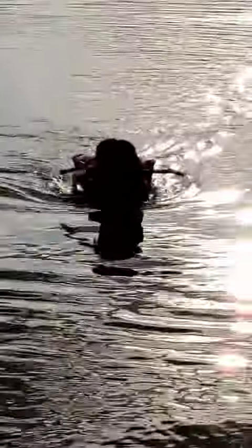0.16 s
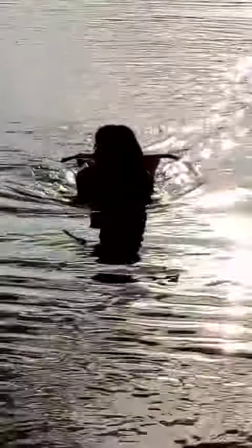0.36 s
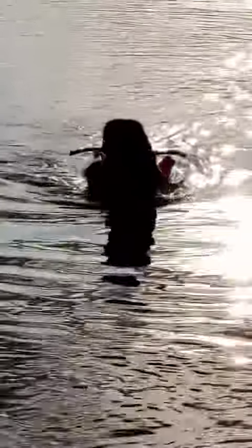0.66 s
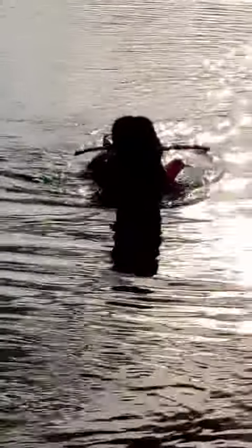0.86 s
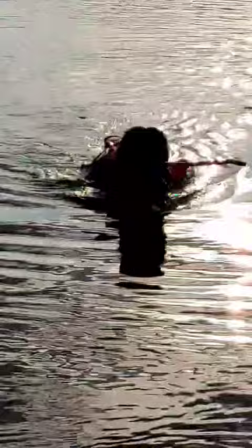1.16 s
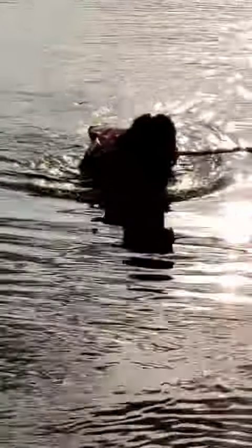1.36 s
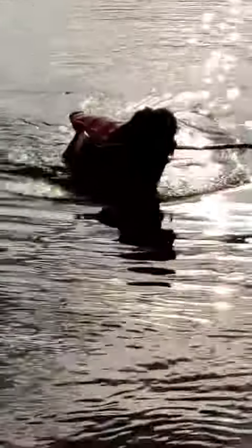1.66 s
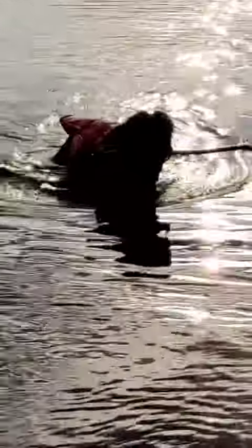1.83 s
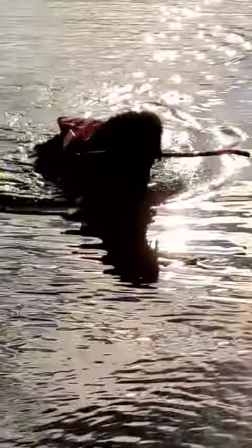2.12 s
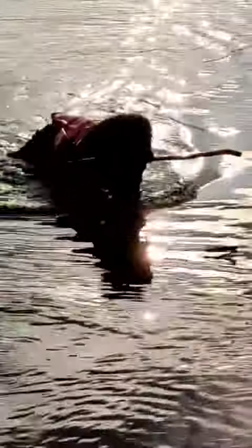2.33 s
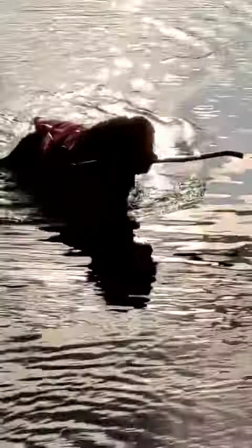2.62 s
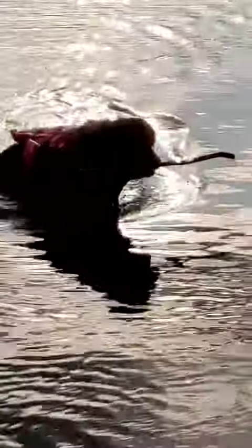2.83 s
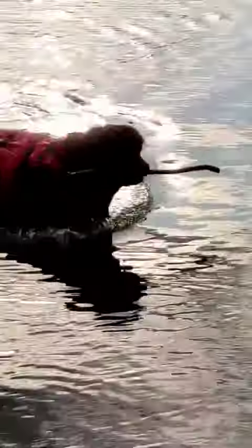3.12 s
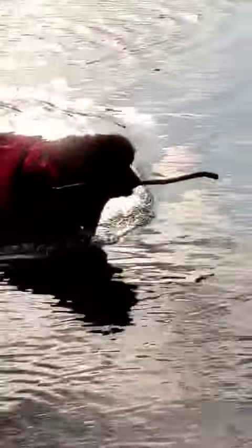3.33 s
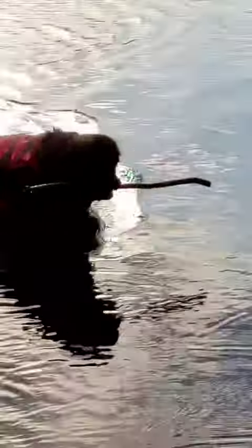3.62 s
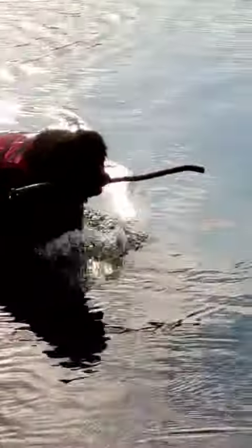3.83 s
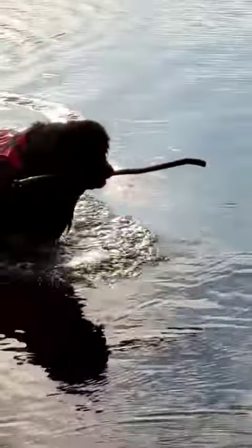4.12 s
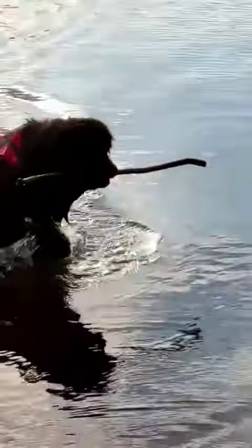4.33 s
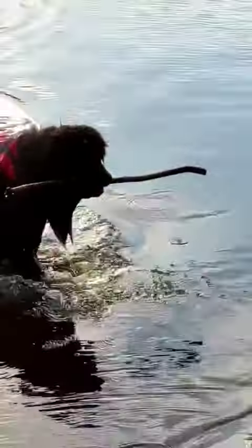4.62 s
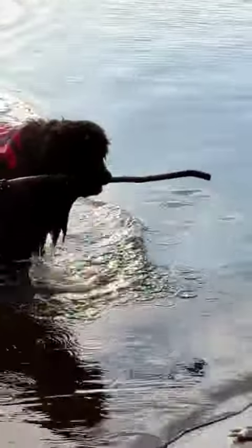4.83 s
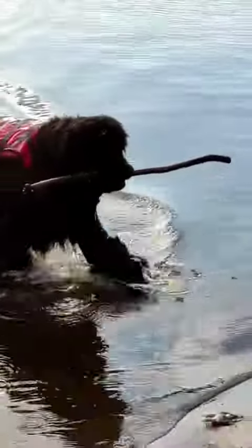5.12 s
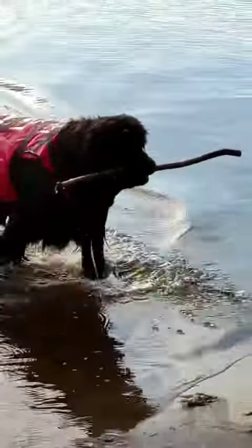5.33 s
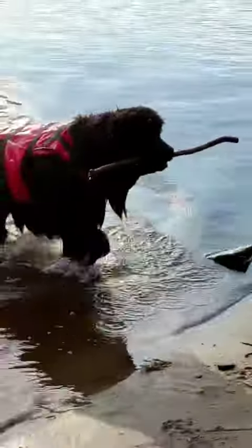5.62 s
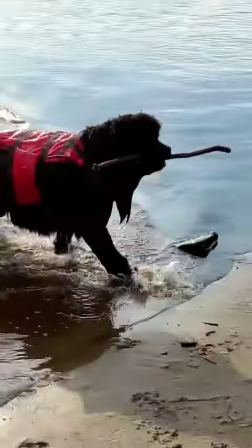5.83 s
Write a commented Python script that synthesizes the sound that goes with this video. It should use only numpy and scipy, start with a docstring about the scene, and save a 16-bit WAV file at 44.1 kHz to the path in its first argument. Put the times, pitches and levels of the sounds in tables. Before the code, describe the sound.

A big dog swims toward a river bank and wades out, heard outdoors in stereo over a steady low rumble and very faint hiss. From 0 to 0.6 s there are light churning, hollow gulps and plinking drips, with a tight pair of dull paw slaps near 0.4 s. A few drips tick at 0.75 s, along with a deep soft wind puff on the microphone. The water then calms; from about 1.3 to 2.9 s only tiny high pings and faint rising chirps remain, with another low puff at 2.2 s. At 2.9 s the churn abruptly returns, surging with leg strokes and growing to a full bubbling splash around 3.8 to 4.2 s, with a sharp high ping at 4.15 s. Another splash comes at 4.45 s, followed by an easing near 4.9 s. A bright plop at 5.1 s leads into dense gurgling, dripping and spatter until the end.

```python
"""A big dog paddles to a river bank with a stick, then wades out through the shallows.
First come gulps of trapped air and slaps of paws, then a lull of pings and soft rising chirps; at about 3 s
the churn returns and grows, with gulps, drips and spatter. Ringing bubbles make the gulps, churn and drips;
random impacts make the slaps and spray. Filtered noise gives the steady outdoor rumble and hiss
throughout and two deep puffs of wind on the microphone, at about 0.7 and 2.2 s."""
import sys
import numpy as np
from scipy import signal
from scipy.fft import rfft, irfft, next_fast_len
from scipy.io import wavfile

SR = 44100
rng = np.random.default_rng(int(sys.argv[2]) if len(sys.argv) > 2 else 0)


def persist_wave(psi):
    """Save psi, clipped to +-1, as 16-bit WAV."""
    counts = np.round(np.clip(psi, -1, 1) * 32767).astype(np.int16)
    wavfile.write(sys.argv[1], SR, np.atleast_2d(counts).T)


N = 263277   # length [samples]
TIME = np.arange(N) / SR   # [s]
FFT_SIZE = next_fast_len(N + 8192, True)
BINS = np.maximum(np.fft.rfftfreq(FFT_SIZE, 1 / SR), 1)   # [Hz]
LEFT_LAG_S, LAG_SPREAD_S = .00015, .00007   # mean delay of the left channel, change per unit of place

# big pockets of air closed by legs and waves:
# (time [s], relative peak level [dB], pitch [Hz], ringing [cycles], pitch rise [share])
GULPS = [(0.105, -36.5, 900, 24, 0.15), (0.212, -34.5, 352, 16, 0.43), (0.373, -31, 352, 22, 0.28),
         (0.379, -30.5, 840, 26, 0.034), (0.396, -41, 774, 39, -0.013), (0.42, -34.5, 258, 23, 0.096),
         (2.951, -30.5, 305, 8.1, 0.052), (3.017, -33, 950, 27, 0.028), (3.184, -37, 543, 22, .2),
         (3.358, -34, 540, 26, -0.38), (3.367, -28.5, 240, 11, 0.034), (3.394, -30.5, 446, 27, -0.14),
         (3.515, -35, 607, 23, 0.066), (3.559, -34.5, 390, 23, 0.075), (3.601, -29.5, 764, 9.3, 0.42),
         (3.755, -27.5, 970, 13, 0.19), (3.773, -29.5, 680, 17, 0.26), (3.846, -22.5, 425, 20, -0.19),
         (3.848, -27, 290, 13, 0.23), (3.861, -27, 385, 15, -0.24), (3.856, -32.5, 1070, 33, .1),
         (3.884, -31.5, 414, 25, -0.13), (3.886, -30, 224, 8.5, 0.13), (3.956, -24, 450, 9, 0.21),
         (4.084, -26, 460, 8, 0.23), (4.094, -26.5, 500, 8.2, 0.07), (4.24, -37, 514, 16, -0.084),
         (4.446, -32.5, 234, 31, 0.26), (4.448, -30, 354, 13, -0.025), (4.447, -28.5, 590, 18, 0.039),
         (4.458, -28, 810, 28, 0.26), (4.459, -27, 1070, 20, -0.15), (4.686, -33.5, 850, 24, 0.33),
         (4.886, -35, 760, 62, 0.17), (4.912, -31, 724, 32, -0.038), (4.954, -31.5, 476, 16, 0.31),
         (4.997, -31.5, 350, 21, 0.63), (5.014, -31, 300, 15, -.2), (5.057, -34, 556, 19, 0.26),
         (5.105, -23, 517, 19, -0.16), (5.106, -34, 333, 20, 0.43), (5.107, -32, 1000, 11, 0.051),
         (5.172, -34, 694, 44, 0.35), (5.186, -35, 647, 23, 0.53), (5.189, -29, 823, 26, 0.17),
         (5.267, -43, 780, 31, .3), (5.316, -33.5, 686, 50, 0.76), (5.39, -35, 1130, 32, 0.6),
         (5.483, -32, 261, 40, 0.59), (5.508, -34.5, 329, 26, 0.51), (5.53, -33, 216, 17, -0.16),
         (5.814, -34, 1170, 43, 0.023)]
# single drops that plink or ping:
# (time [s], relative peak level [dB], pitch [Hz], ringing [cycles], pitch rise [share])
DRIPS = [(0.0795, -32, 1970, 51, .15), (0.188, -30, 1710, 16, .2), (0.277, -41, 3330, 25, .1),
         (0.285, -36, 8360, 44, .03), (0.341, -39, 2070, 37, .1), (0.4205, -32.5, 3400, 25, .1),
         (0.3812, -28.5, 1430, 28, .1), (0.381, -36, 2630, 35, .1), (0.7327, -32, 1890, 37, .1),
         (0.743, -30, 1370, 16, .2), (0.767, -27, 7200, 45, 0.033), (0.786, -33, 2030, 20, 0.49),
         (1.145, -36, 7590, 46, .03), (0.914, -43, 3260, 22, .1), (1.235, -44, 7010, 45, .03),
         (1.269, -42, 7040, 50, .03), (1.367, -45, 7160, 56, .03), (1.605, -42.5, 5000, 18, .03),
         (1.632, -35, 1700, 9.3, .2), (1.731, -46, 7900, 50, .03), (1.819, -44, 5050, 25, .03),
         (2.041, -41, 7600, 39, .03), (2.081, -39, 7100, 46, .03), (2.185, -47, 5140, 25, .03),
         (2.398, -39, 5500, 44, .03), (2.556, -46, 6980, 54, .03), (2.578, -41, 6021, 60, .03),
         (2.594, -47, 4320, 30, .03), (2.618, -45, 7440, 50, .03), (2.820, -41, 7340, 46, .03),
         (2.855, -41, 7500, 50, .03), (2.958, -32, 7300, 60, .03), (3.040, -41, 2700, 45, .1),
         (3.118, -33, 7300, 50, .03), (3.231, -27.5, 1480, 38, 0.18), (3.329, -32, 7240, 55, .03),
         (3.485, -33, 7100, 39, .03), (3.691, -34, 1880, 47, .1), (3.730, -28, 2480, 44, 0.24),
         (3.7713, -27.5, 2020, 31, 0.15), (3.793, -29, 8200, 45, .03), (3.833, -26, 2140, 32, .2),
         (3.858, -23, 7290, 41, .03), (4.002, -31, 1510, 33, .1), (4.098, -32, 2030, 22, .2),
         (4.120, -31, 1920, 31, .2), (4.1475, -13.5, 7330, 23, .03), (4.160, -31, 6660, 41, .03),
         (4.201, -30, 2070, 21, 0.23), (4.216, -31, 1270, 35, .1), (4.230, -25, 6450, 45, .03),
         (4.3376, -26.5, 2180, 40, .1), (4.449, -26, 2010, 55, .1), (4.457, -32, 7500, 45, .03),
         (4.890, -23, 2130, 15, 0.6), (4.920, -29, 2080, 21, .2), (5.1076, -16.5, 2100, 22, 0.089),
         (5.157, -21.5, 6600, 44, .03), (5.189, -31, 5000, 30, .03), (5.325, -28, 2094, 22, .2),
         (5.353, -27, 7000, 49, .03), (5.390, -30, 7378, 50, .03), (5.418, -26, 1500, 33, 0.24),
         (5.492, -33, 7160, 45, .03), (5.546, -27, 2600, 44, 0.092), (5.591, -29, 1947, 34, .2),
         (5.636, -34, 7100, 45, .03), (5.645, -25.5, 2050, 31, 0.18), (5.791, -20, 6670, 56, .03),
         (5.793, -32, 3120, 30, .1), (5.8162, -17, 1480, 36, 0.21), (5.832, -29, 1420, 20, .2),
         (5.957, -26, 2290, 26, .1)]
# spectrum of spray and spatter: (frequency [Hz], relative density [dB per Hz])
SPRAY = [(2000, 2), (3100, -1.5), (3900, -6), (5200, -2.5), (6300, 0), (7600, 5.5), (8400, -1.5),
         (9300, -6), (10200, -19), (12000, -19.5), (15000, -24.5)]


def from_db(db):
    """A level in decibels is 20 times the logarithm of an amplitude ratio."""
    return 10 ** (np.asarray(db) / 20)


def rms_one(x):
    """Mean-square normalization: the middle of the two channels gets rms 1."""
    return x / np.sqrt(np.mean(x.mean(axis=0) ** 2) + 1e-20)


def at_bins(points):
    """Interpolation on a logarithmic frequency axis."""
    hz, value = np.transpose(points)
    return np.interp(np.log(BINS), np.log(hz), value)


def filtered(x, gain):
    """Linear filtering: each frequency component is multiplied by its gain."""
    return irfft(rfft(x, FFT_SIZE) * gain, FFT_SIZE)[..., :N]


def coloured(x, spectrum):
    """Spectral shaping, at equal power for white input."""
    gain = from_db(at_bins(spectrum))
    return filtered(x, gain / np.sqrt(np.mean(gain ** 2)))


def panned(x, pan):
    """Level difference between the channels at each frequency, with a mean gain of 1."""
    gains = from_db(at_bins(pan) * np.array([[.5], [-.5]]))
    return filtered(x, gains / gains.mean(axis=0))


def add(out, s, sound, place):
    """Time difference between the channels: place sets the delay of the left one."""
    lag = LEFT_LAG_S + LAG_SPREAD_S * place
    for channel, start in zip(out, (s + lag / 2, s - lag / 2)):
        i = int(np.clip(start * SR, 0, N - 1))
        channel[i:i + len(sound)] += sound[:N - i]


def burst(s, db, rise_s, fade_s):
    """Exponential attack and decay, as an envelope."""
    out = np.zeros(N)
    span = slice(int(max(s, 0) * SR), int((s + 10 * fade_s) * SR))
    age = np.maximum(TIME[span] - s, 0)
    out[span] = from_db(db) * (1 - np.exp(-age / rise_s)) * np.exp(-age / fade_s)
    return out


def drift(corner_hz):
    """Low-pass noise: slow random variation with a standard deviation of 1."""
    slow = filtered(rng.standard_normal(N), 1 / (1 + (BINS / corner_hz) ** 2))
    return slow / slow.std()


def bubble(hz, cycles, rise):
    """Damped resonance of a bubble: it swells, rings down 60 dB and rises in pitch near the surface."""
    age = np.arange(int(cycles / hz * SR) + 2) / SR * hz   # [cycles of the first pitch]
    life = age / cycles
    envelope = (1 - np.exp(-16 * life)) * from_db(-60 * life)
    phase = 2 * np.pi * age * (1 + rise * life / 2)
    return envelope / envelope.max() * np.sin(phase)


def bubbles(low_hz, high_hz, cycles, rise, spread_db, centre, scatter, count):
    """Superposition of bubbles of random size, moment and place, about even in power per Hz."""
    out = np.zeros((2, N))
    for (when, pitch, size, life), place in zip(rng.random((count, 4)), rng.standard_normal(count)):
        hz = low_hz * (high_hz / low_hz) ** pitch
        strength = hz * from_db(spread_db * min(-np.log(1 - size), 3))
        note = bubble(hz, cycles * (.5 + life), rise)
        add(out, when * N / SR, strength * note, centre + scatter * place)
    return out


def droplets(per_s, spread_db):
    """Shot noise: tiny random impacts, each with its own delay; power about 1 at any rate."""
    chance = np.clip(per_s / SR, 1e-6, 1) * np.ones(N)
    at = np.flatnonzero(rng.random(N) < chance)
    sizes = from_db(spread_db * np.minimum(rng.exponential(1, N), 4.5)) * rng.choice([-1, 1], N)
    sizes = (sizes / sizes.std() / np.sqrt(chance))[at]
    places = .5 * rng.standard_normal(N)[at]
    lags = np.rint((LEFT_LAG_S + LAG_SPREAD_S * places) * SR).astype(int)
    left = np.bincount(np.clip(at + lags, 0, N - 1), sizes, N)
    return np.array([left, np.bincount(at, sizes, N)])


def stir_at(s):
    """Source strength: how hard the dog stirs the water, in dB above steady wading."""
    # stir of the water: (time [s], level before the wading reference is subtracted [dB])
    stir = [(0.0, -70.5), (0.22, -65.5), (0.32, -69), (0.38, -64), (0.56, -68.5), (0.68, -73.5),
            (0.85, -73), (1.23, -72), (1.36, -79.5), (1.61, -81.5), (2.6, -77), (2.895, -80), (2.93, -63.5),
            (3.11, -66), (3.27, -65), (3.42, -69), (3.54, -65.5), (3.66, -58.5), (3.84, -54.5), (4.04, -53),
            (4.22, -57), (4.32, -62), (4.40, -55.5), (4.54, -57.5), (4.67, -60), (4.85, -66.5),
            (5.17, -58.5), (5.97, -56)]
    wading_db = -58
    return np.interp(s, *np.transpose(stir)) - wading_db


def surges():
    """Impulsive forcing: each leg stroke adds a bell-shaped rise or dip, in dB, to stir and slosh."""
    # strides: (time at the height [s], extra stir [dB], extra slosh [dB], half length to 1/e [s])
    strides = [(0.16, 6, 4, 0.011), (0.383, 0, 4, 0.027), (0.461, 5.5, -5, 0.026), (1.043, 4, -1, .02),
               (1.293, 3, 1.5, 0.06), (2.95, -6.5, -3, 0.029), (3.188, 4.5, 8.5, 0.055),
               (3.35, -2.5, 6.5, 0.051), (3.783, 0, 4, 0.052), (3.846, 1.5, 5, 0.044),
               (4.103, -4, 5.5, 0.021), (4.212, 1.5, 2, 0.022), (4.47, 6.5, -9, 0.012),
               (4.915, 3, 5, 0.091), (5.124, 5.5, 2.5, 0.089), (5.416, 0.5, 1.5, 0.026),
               (5.57, 3.5, 3, 0.059), (5.822, 4.5, -9, 0.034)]
    return sum(np.outer([stir_db, slosh_db], np.exp(-np.minimum(((TIME - s) / length) ** 2, 20)))
               for s, stir_db, slosh_db, length in strides)


def breakup(rows, cloud_db):
    """Fragmentation: the envelope of lesser bubbles shed by gulps or drips; the smallest shed none."""
    clouds = [burst(s, db + cloud_db, rise_s=0.013, fade_s=0.021)
              for s, db, hz, *_ in rows if hz < 4000]
    return np.sqrt(sum(cloud ** 2 for cloud in clouds))


def slosh(stir_db, swell_db):
    """Low resonance of big bubbles, which follow the strides and the breakup of gulps."""
    # spectrum: (frequency [Hz], relative density [dB per Hz])
    slosh_spectrum = [(120, -4), (250, 4), (420, 1), (700, 0), (1200, -6.5), (1700, -8), (3000, -24)]
    big = bubbles(low_hz=217.8, high_hz=1505, cycles=20.5, rise=0.43, spread_db=0.0,
                  centre=-0.049, scatter=2.6, count=3600)
    level = np.hypot(from_db(-53 + 0.25 * stir_db + swell_db), breakup(GULPS, cloud_db=-14))
    return level * rms_one(coloured(big, slosh_spectrum))


def babble(stir_db, surge_db, clump_db):
    """Middle resonance of small bubbles, joined by those that drips shed."""
    # spectrum: (frequency [Hz], relative density [dB per Hz])
    babble_spectrum = [(700, 6), (1300, 0.5), (1750, -2), (2150, 1), (2750, -4), (3300, -14), (5000, -13.5)]
    small = bubbles(low_hz=999, high_hz=4170, cycles=20.2, rise=0.26, spread_db=2.5,
                    centre=-2.0, scatter=0.86, count=9000)
    stirred = from_db(-58 + 0.58 * stir_db + 0.76 * surge_db + 0.35 * clump_db)
    level = np.hypot(stirred, breakup(DRIPS, cloud_db=-30))
    return level * rms_one(coloured(small, babble_spectrum))


def crackle(stir_db, surge_db):
    """Short, strongly damped resonances of bursting foam, swelling steeply with each surge."""
    # spectrum: (frequency [Hz], relative density [dB per Hz])
    crackle_spectrum = [(1500, 14), (2300, 3.5), (3300, 1.5), (4000, -6.5), (5000, 0), (6500, -17)]
    # patches of foam that burst at once: (time [s], nominal peak level [dB], fading time to 1/e [s])
    foam_bursts = [(0.378, -46, 0.0075), (0.436, -61, 0.04), (0.733, -50, .008), (2.914, -55, 0.01),
                   (4.448, -49, 0.025), (5.105, -40, 0.011), (5.828, -60, 0.011)]
    foam = bubbles(low_hz=1720, high_hz=5940, cycles=10.0, rise=0.072, spread_db=1.5,
                   centre=-1.5, scatter=0.48, count=2600)
    patches = sum(burst(s, db, 0.0043, fade_s) for s, db, fade_s in foam_bursts)
    level = np.hypot(from_db(-69.5 + 0.56 * stir_db + 2.8 * surge_db), patches)
    return level * rms_one(coloured(foam, crackle_spectrum))


def fizz(stir_db, surge_db, clump_db):
    """High resonance of tiny bubbles: the smaller the bubble, the higher its pitch."""
    # spectrum: (frequency [Hz], relative density [dB per Hz])
    fizz_spectrum = [(2800, -24), (4000, -4), (5200, -11), (6300, -11), (7500, -1), (8400, -3.5),
                     (9500, -18), (12000, -36)]
    tiny = bubbles(low_hz=2920, high_hz=9460, cycles=42, rise=0.053, spread_db=7.0,
                   centre=0, scatter=0.55, count=3400)
    level = from_db(-68 + 0.87 * (stir_db + surge_db) + clump_db)
    return level * rms_one(coloured(tiny, fizz_spectrum))


def mist(stir_db, surge_db, clump_db):
    """Shot noise of fine spray, whose droplets are more numerous when it is stronger."""
    impacts = droplets(per_s=1500 * from_db(0.25 * (stir_db + surge_db)), spread_db=1.0)
    level = from_db(-58 + stir_db + surge_db + clump_db)
    return level * rms_one(coloured(impacts, SPRAY))


def ticking(stir_db, surge_db):
    """Brief resonances of bigger drops in the spray, each at its own pitch."""
    # spectrum: (frequency [Hz], relative density [dB per Hz])
    drop_spectrum = [(2000, -0.5), (3100, -4), (4000, -6), (5200, -2), (7000, 4.5), (9000, -13),
                     (12000, -38)]
    drops = bubbles(low_hz=2640, high_hz=8600, cycles=9.8, rise=0.057, spread_db=5.0,
                    centre=-1.0, scatter=0.4, count=1000)
    return from_db(-66 + stir_db + surge_db / 2) * rms_one(coloured(drops, drop_spectrum))


def churn():
    """Superposition of bubbles and spray driven by one stir; some of them come in uneven clumps."""
    stir_db = stir_at(TIME)
    surge_db, swell_db = surges()
    clump_db = 2.5 * drift(corner_hz=8.6)   # water falls back unevenly
    bubbling = slosh(stir_db, swell_db) + babble(stir_db, surge_db, clump_db)
    bursting = crackle(stir_db, surge_db) + fizz(stir_db, surge_db, clump_db)
    return bubbling + bursting + mist(stir_db, surge_db, clump_db) + ticking(stir_db, surge_db)


def plops(rows, gain_db, place):
    """Resonance of single trapped bubbles: short gliding notes, as deep gulps or high drips."""
    out = np.zeros((2, N))
    for (s, db, hz, cycles, rise), aside in zip(rows, rng.standard_normal(200)):
        add(out, s, from_db(db + gain_db) * bubble(hz, cycles, rise), place + aside)
    return out


def stray_gulps():
    """Poisson process of lesser air pockets, louder in stirred water: rows like GULPS."""
    per_s, low_hz, high_hz = 14, 272, 1134
    cycles, greatest_rise = 22, 0.6
    gaps, pitches, glides = rng.random((120, 3)).T
    times = np.cumsum(-np.log(1 - gaps)) / per_s
    levels = -45 + 0.52 * stir_at(times)
    notes = low_hz * (high_hz / low_hz) ** pitches
    return [(s, db, hz, cycles, greatest_rise * glide)
            for s, db, hz, glide in zip(times, levels, notes, glides) if s < TIME[-1]]


def splashes(slap_db, spatter_db, spatter_rise_s, first_drop_db):
    """Impact noise: dense dull slaps, and short bright spatters led by the tick of their biggest drop."""
    # paws slap the surface: (time [s], relative peak level [dB], fading time to 1/e [s])
    slaps = [(0.375, -28, 0.0083), (0.42, -26, 0.0092), (3.844, -45, 0.012), (4.082, -28, 0.0029),
             (4.448, -35, 0.036), (5.106, -42, 0.016), (5.172, -46, 0.018)]
    # flung water falls: (time [s], relative peak level [dB], fading time to 1/e [s])
    spatters = [(0.267, -47, 0.0055), (0.419, -51, 0.0035), (0.511, -48, 0.008), (0.743, -39.5, 0.0032),
                (0.766, -40, 0.0026), (2.745, -53.5, 0.0043), (2.956, -41, 0.0028), (2.991, -46.5, 0.0035),
                (3.631, -34, 0.0038), (3.721, -39, 0.0066), (3.731, -45, .002), (3.791, -36, 0.0021),
                (3.844, -36, 0.0033), (3.885, -26, 0.0012), (4.025, -37, 0.0025), (4.143, -34, 0.0023),
                (4.373, -39.5, 0.0072), (4.667, -41, 0.0066), (4.826, -43, 0.0038), (5.103, -37, 0.0087),
                (5.176, -37, 0.0022), (5.303, -38.5, 0.004), (5.389, -33.5, 0.0025), (5.571, -37, 0.0022),
                (5.7675, -42.5, 0.02)]
    # spectrum of slaps: (frequency [Hz], relative density [dB per Hz])
    slap_spectrum = [(120, -36), (280, -2), (520, 1), (800, 30), (1500, -28), (2200, -16), (3500, -3),
                     (6000, -22), (8000, 5.5), (11000, -14)]
    impacts = droplets(per_s=9000, spread_db=2)
    slap = impacts * sum(burst(s, db, 0.0021, fade_s) for s, db, fade_s in slaps)
    spatter = impacts * sum(burst(s, db, spatter_rise_s, fade_s) for s, db, fade_s in spatters)
    for s, db, _ in spatters:
        add(spatter, s, from_db([db + first_drop_db]), 0)
    dull = from_db(slap_db) * coloured(slap, slap_spectrum)
    return dull + from_db(spatter_db) * coloured(spatter, SPRAY)


def chirps(rows, gain_db, place):
    """Frequency modulation: a rising bubble swells and fades while its pitch climbs and levels off."""
    out = np.zeros((2, N))
    for s, db, hz, rise, length in rows:
        life = np.linspace(0, 1, int(length * SR) + 2)
        pitch = hz * (1 + rise * np.sin(np.pi * life / 2))
        tone = np.sin(2 * np.pi * np.cumsum(pitch) / SR)
        add(out, s, from_db(db + gain_db) * np.sin(np.pi * life) ** 2 * tone, place)
    return out


def gurgle():
    """Poisson process of lesser rising bubbles, louder in stirred water: rows for chirps."""
    per_s, low_hz, high_hz = 70, 703.5, 1887
    cycles, greatest_rise = 17.5, 0.37
    gaps, pitches, glides, sizes = rng.random((600, 4)).T
    times = np.cumsum(-np.log(1 - gaps)) / per_s
    notes = low_hz * (high_hz / low_hz) ** pitches
    levels = -48 + 0.86 * stir_at(times) - 12 * sizes
    return [(s, db, hz, greatest_rise * glide, cycles / hz)
            for s, db, hz, glide in zip(times, levels, notes, glides) if s < TIME[-1]]


def bank(x, echo_db, fade_s):
    """Diffuse reflection off the shore: a decaying noise response, different in each channel."""
    age = np.arange(SR // 4) / SR
    tail = rng.standard_normal((2, len(age))) * np.exp(-age / fade_s)
    tail /= np.sqrt(np.sum(tail ** 2, axis=1, keepdims=True))
    # long waves hardly scatter
    tail = signal.sosfilt(signal.butter(1, 900, "high", fs=SR, output="sos"), tail)
    return from_db(echo_db) * signal.fftconvolve(x, tail, axes=1)[:, :N]


def outdoors():
    """Partly coherent noise field: distant rumble and faint hiss, most alike in the bass."""
    # spectra of rumble and hiss: (frequency [Hz], relative density [dB per Hz])
    rumble_spectrum = [(20, -11.5), (42, -7.5), (63, 0), (82, -6.5), (135, -5.5), (180, 0.7), (255, -0.5),
                       (420, -10.5), (600, -16), (920, -8.5), (1320, -19.5), (2300, -32), (3400, -45),
                       (5000, -84)]
    air_spectrum = [(1760, -18), (3000, -35), (3870, -15), (4740, -15), (5110, -9), (5840, -24),
                    (8180, -6.5), (15000, -49)]
    # lean of the rumble: (frequency [Hz], left-minus-right level [dB])
    rumble_pan = [(60, 4.5), (130, 3.5), (290, 6), (640, 4), (1410, 2), (3100, -1), (6820, 2), (15000, 3)]
    # likeness of the channels: (frequency [Hz], correlation [-1 to 1])
    likeness = [(60, 0.91), (130, 1), (290, 0.89), (640, 0.72), (1410, 0.42), (3100, 0.22), (6820, 0.2),
                (15000, 0.3)]
    mid, side = rng.standard_normal((2, N))
    alike = np.clip(at_bins(likeness), -.99, .99)
    field = filtered(mid, np.sqrt(1 + alike)) + filtered(side, np.sqrt(1 - alike)) * [[1], [-1]]
    rumble = from_db(-47) * rms_one(coloured(field, rumble_spectrum))
    hiss = from_db(-87) * rms_one(coloured(field, air_spectrum))
    return panned(rumble, rumble_pan) + hiss


def wind(eddy_hz):
    """Turbulent pressure: each puff is a brief, very deep buffet, independent in each channel."""
    # puffs on the microphone: (time at the height [s], peak of the rms level [dB], half length to 1/e [s])
    puffs = [(0.727, -45.5, 0.068), (2.247, -46, 0.07)]
    low_pass = signal.butter(2, eddy_hz, fs=SR, output="sos")
    eddies = signal.sosfilt(low_pass, rng.standard_normal((2, N)))
    return rms_one(eddies) * sum(from_db(db) * np.exp(-((TIME - s) / length) ** 2)
                                 for s, db, length in puffs)


def scene():
    """Superposition of the dog in the water, the shore's echoes and the open air."""
    # clear rising bubbles:
    # (time [s], relative peak level [dB], first pitch [Hz], pitch rise [share], length [s])
    clear_chirps = [(1.032, -44.5, 1340, .68, .02), (1.296, -49, 1550, .04, 0.044),
                    (1.70, -53, 1540, .07, .026), (2.270, -51.5, 1870, 0.26, 0.027),
                    (2.911, -52, 1620, 0.55, 0.024), (2.977, -47, 1262, 0.24, 0.028),
                    (3.266, -46, 1350, .18, .026), (3.292, -50, 1600, .15, 0.017),
                    (5.066, -42, 1640, 0.32, .015)]
    # lean of the water: (frequency [Hz], left-minus-right level [dB])
    water_pan = [(100, -3), (380, 8.5), (700, 0), (1300, 0.5), (2400, 4.5), (3300, -1), (4400, -4.5),
                 (6000, -7.5), (8100, -2), (12000, 2)]
    gulps = plops(GULPS + stray_gulps(), gain_db=-7.0, place=-0.41)
    drips = plops(DRIPS, gain_db=-13.5, place=-1.4)
    rising = chirps(clear_chirps + gurgle(), gain_db=-3.0, place=-1.1)
    thrown = splashes(slap_db=-13.0, spatter_db=0.0, spatter_rise_s=0.0019, first_drop_db=7.0)
    water = panned(churn() + gulps + drips + rising + thrown, water_pan)
    return water + bank(water, echo_db=-3.5, fade_s=0.011) + outdoors() + wind(eddy_hz=24.8)


def record(dry):
    """Band limitation: an elliptic low-pass cuts steeply above 15600 Hz."""
    return signal.sosfilt(signal.ellip(10, .2, 80, 15600, fs=SR, output="sos"), dry)


dry = scene()
out = record(dry)
persist_wave(out)
```